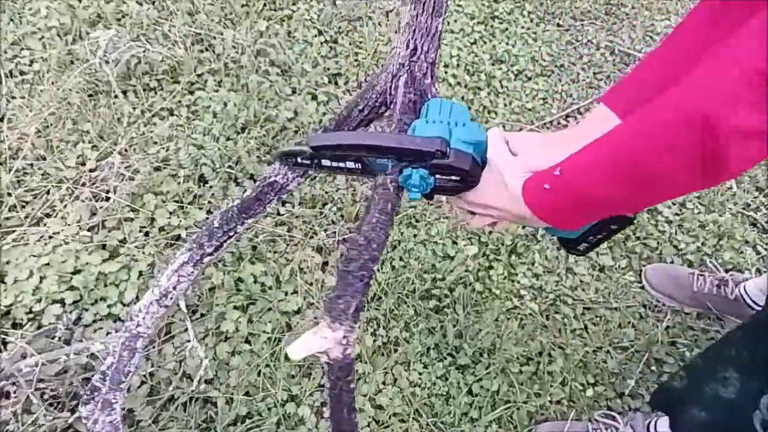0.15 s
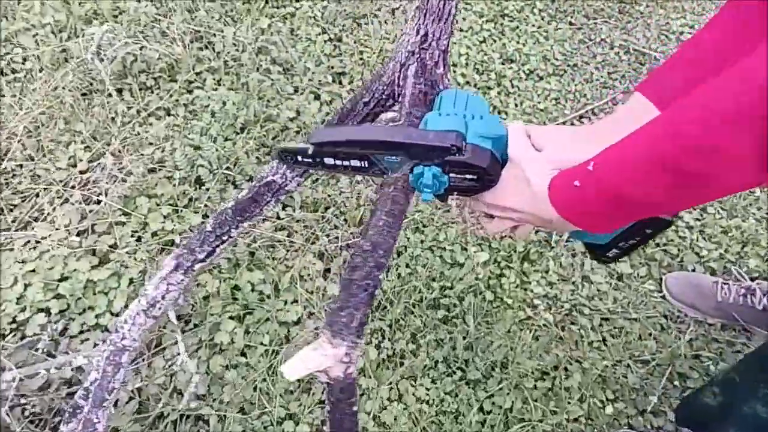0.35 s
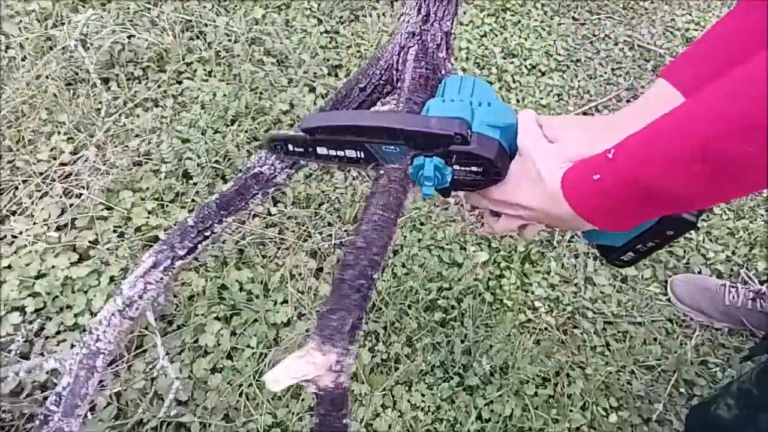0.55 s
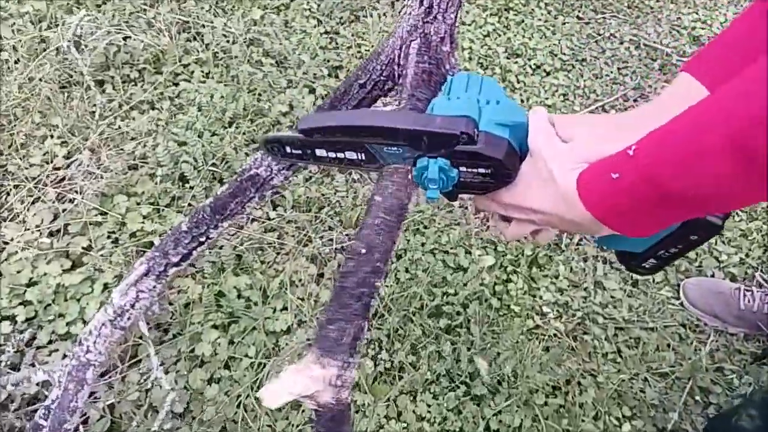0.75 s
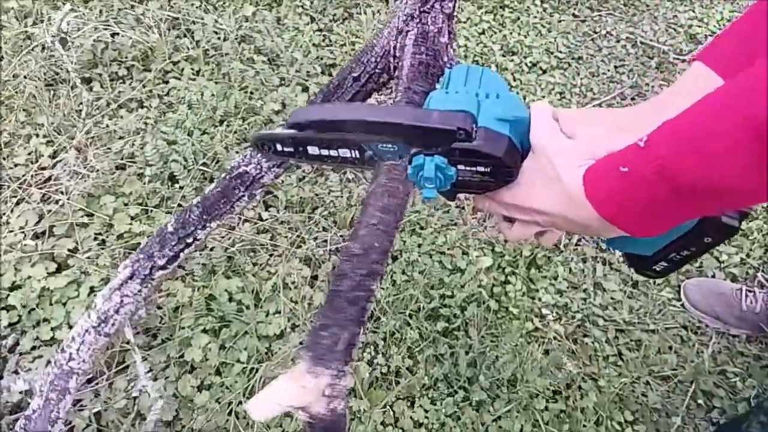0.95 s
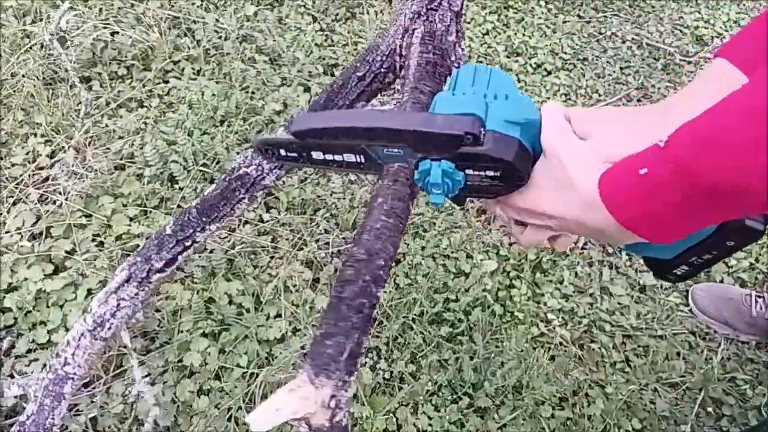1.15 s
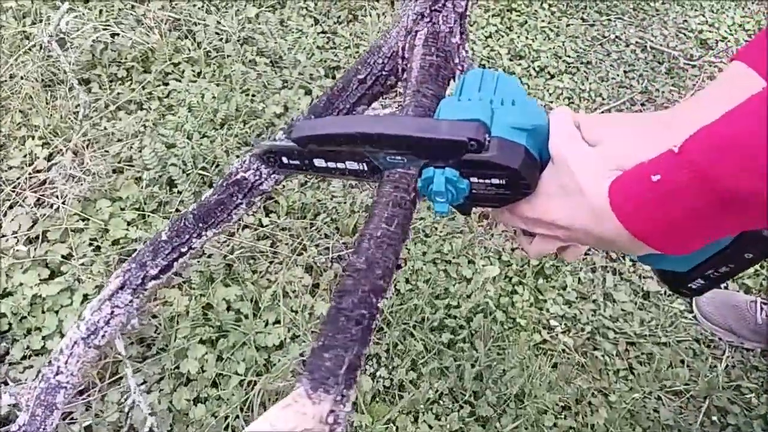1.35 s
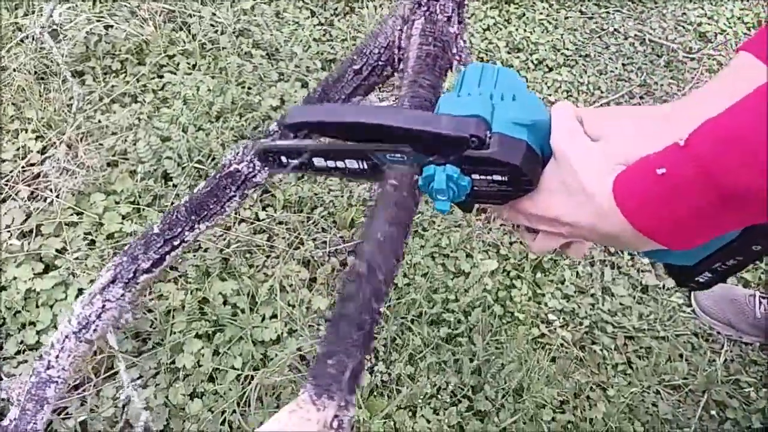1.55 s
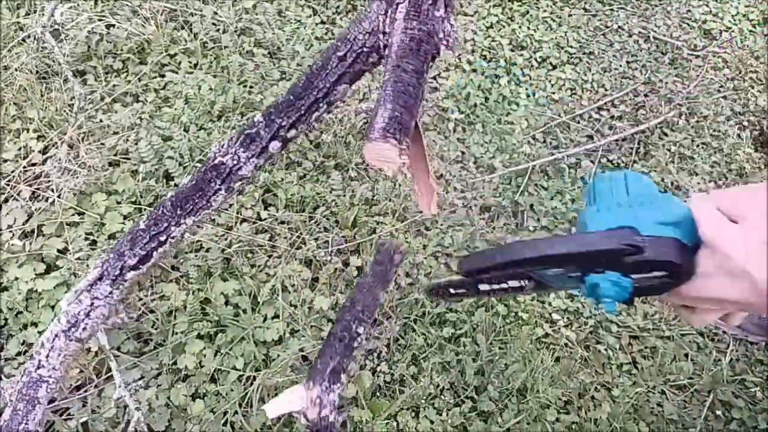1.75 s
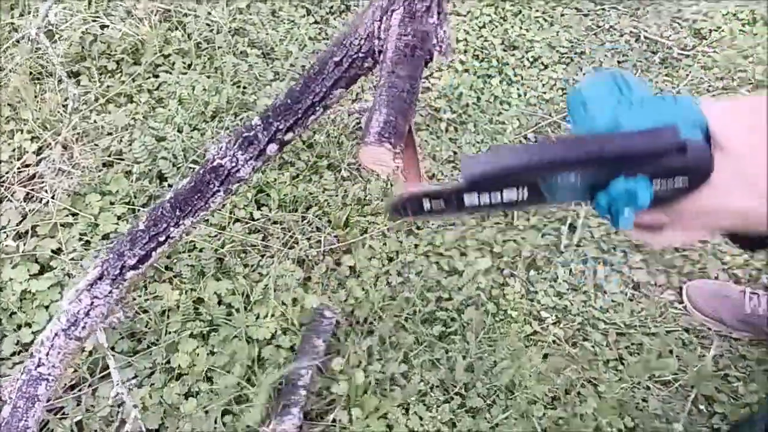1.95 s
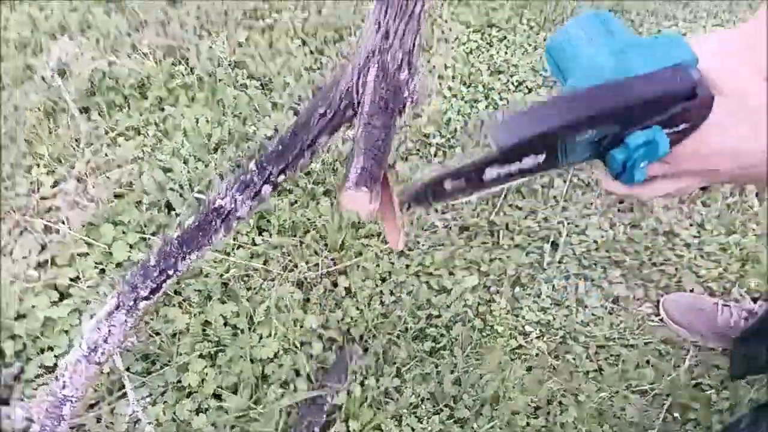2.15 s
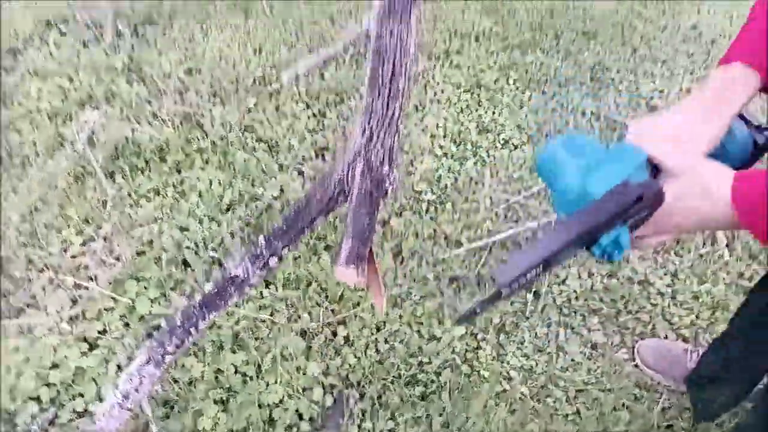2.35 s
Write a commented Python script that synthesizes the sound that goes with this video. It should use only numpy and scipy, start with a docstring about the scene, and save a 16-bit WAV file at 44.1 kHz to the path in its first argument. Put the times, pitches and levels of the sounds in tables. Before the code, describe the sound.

Small electric chainsaw rasping through a branch outdoors, breaking through into a thin whine.

```python
"""Outdoors, close to a small battery chainsaw, on a phone's two microphones. The saw cuts a dead branch and
squeaks through; a motor whine rises, then sags and stops while the cutters keep biting. Each cutter bite is a
puff of rasp that rings the branch; chips tick, and wind pops on one microphone at a time. The left microphone
peaks near 7 kHz and hears late, the right one peaks near 1.9 kHz."""
import sys
import numpy as np
from scipy import signal
from scipy.fft import rfft, irfft
from scipy.io import wavfile
from scipy.ndimage import uniform_filter1d, map_coordinates

SR = 44100
rng = np.random.default_rng(int(sys.argv[2]) if len(sys.argv) > 2 else 0)


def generate_wav(signal):
    """Clip the signal to [-1, 1] and save it as 16-bit WAV at the path in sys.argv[1]."""
    frames = np.transpose(np.atleast_2d(signal))
    scaled = np.clip(frames, -1, 1) * 32767
    pcm = np.round(scaled).astype(np.int16)
    wavfile.write(sys.argv[1], SR, pcm)


N = 110205
TIME_S = np.arange(N) / SR

# Pace of the cutters: time_s, bites_per_s
BITE_RATE = [(0, 69.04), (.215, 68.0), (.43, 66.9), (.645, 64.84), (.86, 64.27), (1.075, 62.61),
             (1.29, 58.73), (1.505, 61.05), (1.72, 59.18)]
# Steady rasp between the bites: time_s, ratio_to_bites
STEADY_RASP = [(0, 1.37), (1.0, 1.48), (1.25, 3.6), (1.7, 3.4), (1.75, 3.1)]
# Chain rasp: time_s, level_db, right_body_gain_db, right_treble_gain_db
RASP_LEVELS = [(0, -25.5, -3.5, -10), (.6, -23, 0, -6.5), (.95, -21.5, -2.5, -7), (1.26, -20.5, -1, -10),
               (1.715, -18.5, -0.5, -8), (1.74, -24, -10, -11), (1.79, -21.5, 0.5, -9), (1.84, -20, 4, -4),
               (2.03, -17, 2.5, -1.5), (2.12, -17, 1, -1), (2.3, -19.5, -0.5, -5), (2.5, -25.5, -0.5, -5.5)]
# Colour of rasp and microphone together, each side: frequency_hz, gain_db
LEFT_COLOUR = [(620, -41.5), (700, -26), (1250, -24), (1700, -14), (2300, -18), (3000, -13), (3900, -15),
               (5500, -11.5), (6500, -4.5), (7000, 1.5), (7500, -1), (8000, -15), (9000, -17),
               (10500, -28.5), (15500, -43)]
RIGHT_COLOUR = [(600, -41.5), (1250, -42), (1500, -21.5), (1700, -11.5), (1850, -7), (2100, -12.5),
                (2280, -22), (2600, -27.5), (3600, -28.5), (4500, -31.5), (5500, -21.5), (6200, -26),
                (9500, -22), (11000, -28.5), (15500, -31)]

# Modes of the branch, its low shake, the chain, a sharp ring near 3.6 kHz, the guide bar
# and the bar's thin ring: pitch_hz, nominal_width_hz, relative_db
BRANCH_MODES = [(758, 82, -0.5), (833, 192, 1), (1011, 690, 3), (2606, 200, 5)]
SHAKE_MODES = [(129, 22, -3), (179.5, 14.4, -5.5), (417, 340, 1)]
CHAIN_MODES = [(1858, 140, 5), (1639, 63, -1.5)]
SHARP_MODES = [(3690, 170, -4.5), (3430, 120, -14)]
BAR_MODES = [(4130, 90, -3), (4830, 80, -4)]
THIN_BAR_MODES = [(4560, 45, 0)]
# Ringing during the cut: time_s, branch_db, chain_db
CUT_LEVELS = [(0, -34, -42.5), (.07, -52.5, -51), (.18, -35.5, -45), (.3, -43.5, -52), (.43, -30.5, -68),
              (.5, -39.5, -41.5), (.63, -33, -51), (.82, -41, -47), (.95, -28.5, -35.5), (1.02, -36.5, -50),
              (1.08, -33.5, -36.5), (1.2, -39, -46.5), (1.45, -34.5, -32.5), (1.55, -31, -45),
              (1.67, -35, -43), (1.72, -55, -70)]
# The branch's shake and the sharp ring: time_s, level_db
SHAKE_LEVELS = [(0, -71), (.15, -48), (.24, -68), (.4, -46.5), (.5, -59.5), (.7, -48), (1.02, -45.5),
                (1.2, -54), (1.42, -44.5), (1.5, -74), (1.66, -39), (1.74, -59)]
SHARP_LEVELS = [(0, -28), (.08, -27), (.33, -31.5), (.47, -50)]
# Guide bar ringing after the cut: time_s, bar_db, thin_ring_db
BAR_LEVELS = [(1.7, -50, -52), (2.05, -35, -42), (2.19, -27.5, -28), (2.27, -34, -26), (2.36, -48, -40)]
# How the rings reach the right microphone: frequency_hz, gain_db
RIGHT_RING_COLOUR = [(500, -0.5), (800, -2.5), (1250, 0), (1850, 19.5), (2250, 0.5), (5000, -8.5)]

# Wind rumble on the microphones: time_s, left_db, right_db
RUMBLE_LEVELS = [(0, -102, -68.5), (1.5, -55.5, -63), (1.56, -32.5, -49), (1.71, -74, -78),
                 (1.82, -49.5, -70), (1.95, -31, -56), (2.02, -119, -57), (2.12, -54, -49.5),
                 (2.2, -34, -34.5), (2.26, -49, -35.5), (2.38, -38.5, -61), (2.5, -42.5, -82)]
# Snaps of the cut end and ticks of chips: start_s, level_db
TICK_BLOWS = [(.494, -21), (.513, -17), (1.809, -11), (1.863, -19)]
# Modes those blows ring: pitch_hz, nominal_width_hz, gain_db
CHIP_MODES = [(1160, 400, -11), (3000, 900, -1), (4700, 800, -5), (7100, 900, -2)]
# Wind pops: centre_s, envelope_db, pitch_hz, half_width_cycles, microphone (0 left, 1 right)
WIND_POPS = [(1.523, -8.5, 164, 0.23, 0), (1.881, -20.5, 147, 1.24, 0), (1.910, -16.5, 155, 0.46, 0),
             (1.93, -16.5, 146, 0.69, 0), (2.185, -23.5, 325, 1.53, 1), (2.24, -23, 177.5, 2.2, 1),
             (2.299, -15.5, 141, 0.33, 1), (2.388, -21.5, 123, 0.89, 0), (2.402, -24, 186, 1.05, 0),
             (2.421, -18, 173, 0.58, 0)]
# Whine of the motor: time_s, pitch_hz, left_db, right_db
MOTOR_WHINE = [(1.73, 2470, -48, -53), (1.77, 2655, -29.5, -41), (1.80, 2725, -25.5, -36),
               (1.83, 2753, -24, -22.5), (1.89, 2765, -24.5, -55), (1.93, 2765, -23, -22),
               (1.955, 2772, -47, -35), (2.01, 2778, -31, -35), (2.08, 2782, -28.5, -44),
               (2.16, 2783, -18.5, -38), (2.19, 2783, -18, -31), (2.233, 2785, -22, -36),
               (2.272, 2540, -27.5, -46)]
# Gear tone: time_s, left_db, right_db
GEAR_LEVELS = [(1.77, -63, -45), (1.98, -44, -36), (2.05, -48, -39), (2.18, -44, -60), (2.22, -19.5, -54),
               (2.24, -64, -70)]
# Lateness of the left microphone as the saw swings aside: time_s, delay_s
LEFT_DELAY = [(1.75, .0007), (1.9, .00095)]


def undb(db):
    return 10 ** (np.asarray(db) / 20)


def unit(x):
    return x / np.sqrt(np.mean(x ** 2))


def curve(table, column=1):
    """One column of a table over time."""
    rows = np.array(table, float)
    return np.interp(TIME_S, rows[:, 0], rows[:, column])


def highpass(x, hz):
    return signal.sosfilt(signal.butter(2, hz, "high", fs=SR, output="sos"), x)


def colour(x, points):
    """Minimum-phase filter through (frequency_hz, gain_db) points."""
    points, size = np.array(points, float), 2048
    hz = np.maximum(np.arange(size // 2 + 1) * SR / size, 20)
    gain_db = np.interp(np.log(hz), np.log(points[:, 0]), points[:, 1])
    cepstrum = irfft(np.log(undb(gain_db)))
    cepstrum[1:size // 2] *= 2
    cepstrum[size // 2 + 1:] = 0
    return signal.fftconvolve(x, irfft(np.exp(rfft(cepstrum))))[:N]


def resonate(x, hz, widths_hz):
    """Resonators in series, one for each width, with gain 1 at the centre."""
    for width in widths_hz:
        x = signal.lfilter(*signal.iirpeak(hz, hz / width, SR), x)
    return x


def cutter_bites(first_bite_s=.0087, jitter_cycles=.04, width_cycles=.18, scatter_db=1.3):
    """Cutters bite unevenly: gives the puff envelope, tooth strikes and bite number at each sample."""
    cycles = np.cumsum(curve(BITE_RATE)) / SR + 1.5 - first_bite_s * BITE_RATE[0][1]
    bite_number = cycles.astype(int)
    timing, force = rng.standard_normal((400, 2))[bite_number].T
    from_centre = cycles % 1 - .5 - jitter_cycles * timing
    puffs = np.exp(-.5 * (from_centre / width_cycles) ** 2) * undb(scatter_db * force)
    at_centre = np.maximum(np.diff(np.sign(from_centre), prepend=1), 0)
    return unit(puffs), unit(at_centre * puffs), bite_number


def fill_between(puffs, steady):
    """Steady rasp fills the gaps between bites while the power stays about the same."""
    return (puffs + steady) / np.sqrt(1 + 2.03 * steady + steady ** 2)


def grit(unevenness_db=1):
    """Noise with uneven millisecond grains."""
    grains = unit(uniform_filter1d(rng.standard_normal(N), size=60))
    return unit(rng.standard_normal(N) * undb(unevenness_db * grains))


def shifting_peaks(x, depth_db=3.5, width_hz=170, length_s=.08):
    """Narrow peaks and dips come and go across the spectrum as the saw moves."""
    hz, times, spectrum = signal.stft(x, SR, nperseg=1024)
    patches = rng.standard_normal(spectrum.shape)
    for _ in range(2):
        patches = uniform_filter1d(patches, size=round(width_hz / hz[1]), axis=0)
        patches = uniform_filter1d(patches, size=round(length_s / times[1] / 2), axis=1)
    patches = patches - uniform_filter1d(patches, size=20, axis=0)  # broad bands keep their level
    taper = np.clip(2 - hz / 5000, .4, 1)  # the top hiss stays smooth
    spectrum = spectrum * undb(depth_db * unit(patches) * taper[:, None])
    return unit(signal.istft(spectrum, SR, nperseg=1024)[1][:N])


def chain_rasp(puffs, treble_unlike=.97, unlike_above_hz=2200, pressure_db=.8, treble_hz=2640):
    """The chain rasps in puffs as the hand's pressure wavers; each microphone gets its own treble."""
    left_grit, other_grit = shifting_peaks(grit()), shifting_peaks(grit())
    swap = (np.sqrt(1 - treble_unlike ** 2) - 1) * left_grit + treble_unlike * other_grit
    right_grit = left_grit + highpass(swap, unlike_above_hz)
    pressure = unit(uniform_filter1d(uniform_filter1d(rng.standard_normal(N), size=3000), size=3000))
    level = undb(curve(RASP_LEVELS) + pressure_db * pressure)
    envelope = fill_between(puffs, curve(STEADY_RASP)) * level
    left_rms = np.sqrt(np.mean(colour(left_grit, LEFT_COLOUR) ** 2))
    left = colour(left_grit * envelope, LEFT_COLOUR) / left_rms
    right = colour(right_grit * envelope, RIGHT_COLOUR) / left_rms
    treble = highpass(highpass(right, treble_hz), treble_hz)
    right = (right - treble) * undb(curve(RASP_LEVELS, 2)) + treble * undb(curve(RASP_LEVELS, 3))
    return np.array([left, right])


def ringing_body(drive, bite_number, modes, scatter_db=2.5, widen=1.2):
    """Each bite favours different modes; the favourites drift, more so in a body with many modes."""
    scatter, drift = rng.standard_normal((2, 400, len(modes)))
    drift = unit(uniform_filter1d(drift, size=7, axis=0))  # over seven bites
    drift_db = 4 * min(len(modes) / 7, 1)
    shares = undb(scatter_db * scatter + drift_db * drift)
    sound = np.zeros(N)
    for k, (hz, width, db) in enumerate(modes):
        sound += undb(db) * unit(resonate(drive * shares[bite_number, k], hz, [widen * width] * 2))
    return unit(sound)


def wood_and_steel_rings(puffs, strikes, bite_number, strike_gain=1.8):
    """Rasp and sharp tooth strikes ring the branch, the chain and the guide bar."""
    bodies = [(BRANCH_MODES, curve(CUT_LEVELS, 1)), (CHAIN_MODES, curve(CUT_LEVELS, 2)),
              (SHARP_MODES, curve(SHARP_LEVELS)), (BAR_MODES, curve(BAR_LEVELS, 1)),
              (THIN_BAR_MODES, curve(BAR_LEVELS, 2)), (SHAKE_MODES, curve(SHAKE_LEVELS))]
    steady = curve(STEADY_RASP)
    envelope = fill_between(puffs, .5 * steady)  # the rings take less of the steady rasp
    sound = np.zeros(N)
    for modes, level_db in bodies:
        drive = envelope * rng.standard_normal(N) + strike_gain * strikes / (1 + steady)
        sound += ringing_body(drive, bite_number, modes) * undb(level_db)
    return sound


def wind_rumble(centre_hz=77, widths_hz=(77, 154)):
    """Wind rumbles on each microphone separately, faint at first."""
    sides = []
    for column in (1, 2):
        rumble = resonate(rng.standard_normal(N), centre_hz, widths_hz)
        sides.append(undb(curve(RUMBLE_LEVELS, column)) * unit(highpass(rumble, hz=31)))
    return np.array(sides)


def chip_ticks():
    """The cut end snaps and chips tick: sharp blows ring a few short modes."""
    blows, sound = np.zeros((2, N))
    for start_s, level_db in TICK_BLOWS:
        blows[int(start_s * SR)] = undb(level_db)
    for hz, width, db in CHIP_MODES:
        makeup = np.e * SR / (2 * np.pi * width)  # restores the peak that the resonators spread out
        sound += undb(db) * makeup * resonate(blows, hz, [width] * 2)
    return sound


def wind_pops():
    """Wind hits one microphone at a time with a short, low pop."""
    sound = np.zeros((2, N))
    for centre_s, db, hz, half_width, microphone in WIND_POPS:
        cycles = (TIME_S - centre_s) * hz
        envelope = undb(db) * np.exp(-(cycles / half_width) ** 2)
        sound[int(microphone)] -= envelope * np.sin(2 * np.pi * cycles)
    return sound


def breakthrough_squeak(centre_s=1.733, half_width_s=.022, left_db=-24, right_db=-38):
    """The chain breaks through with a rough, rising squeak."""
    progress = (TIME_S - centre_s) / half_width_s
    pitch_hz = 4080 + 150 * np.clip(progress, -3, 3)
    roughness = unit(uniform_filter1d(rng.standard_normal(N), size=70))
    squeak = np.exp(-progress ** 2) * roughness * np.sin(2 * np.pi * np.cumsum(pitch_hz) / SR)
    return squeak * undb([[left_db], [right_db]])


def motor_whine(gear_ratio=1.75, fade_s=.004):
    """The motor sings a clean tone with a gear tone above; both sag and stop at the end."""
    start_s, end_s = MOTOR_WHINE[0][0], MOTOR_WHINE[-1][0]
    gate = np.clip(np.minimum(TIME_S - start_s, end_s - TIME_S) / fade_s, 0, 1)
    phase = 2 * np.pi * np.cumsum(curve(MOTOR_WHINE)) / SR
    motor = undb([curve(MOTOR_WHINE, 2), curve(MOTOR_WHINE, 3)]) * np.sin(phase)
    gear = undb([curve(GEAR_LEVELS, 1), curve(GEAR_LEVELS, 2)]) * np.sin(gear_ratio * phase)
    return np.sqrt(2) * gate * (motor + gear)


def scene():
    """The saw close by, reaching the left microphone just after the right, with wind on both."""
    puffs, strikes, bite_number = cutter_bites()
    rasp = chain_rasp(puffs)
    left_rings = wood_and_steel_rings(puffs, strikes, bite_number) + chip_ticks()
    right_only = wood_and_steel_rings(puffs, strikes, bite_number)
    right_rings = colour(.23 * left_rings + .33 * right_only, RIGHT_RING_COLOUR)
    left, right = rasp + np.array([left_rings, right_rings]) + breakthrough_squeak() + motor_whine()
    late_left = map_coordinates(left, [np.arange(N) - curve(LEFT_DELAY) * SR], mode="mirror")
    return np.array([late_left, right]) + wind_rumble() + wind_pops()


def record(dry):
    """The phone cuts the bass below 50 Hz and the top above 15.75 kHz."""
    top_cut = signal.ellip(16, .3, 60, 15750, fs=SR, output="sos")
    return signal.sosfilt(top_cut, highpass(dry, hz=50))


dry = scene()
out = record(dry)
generate_wav(out)
```